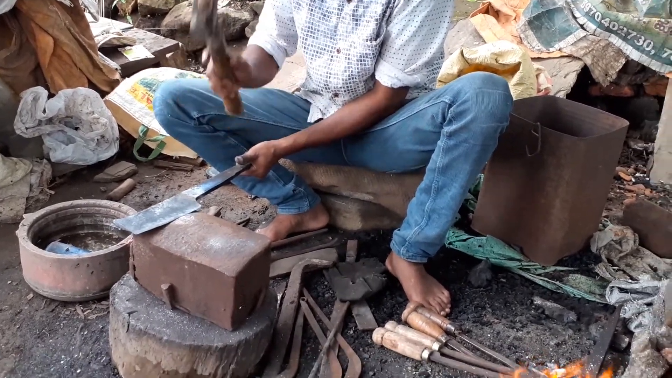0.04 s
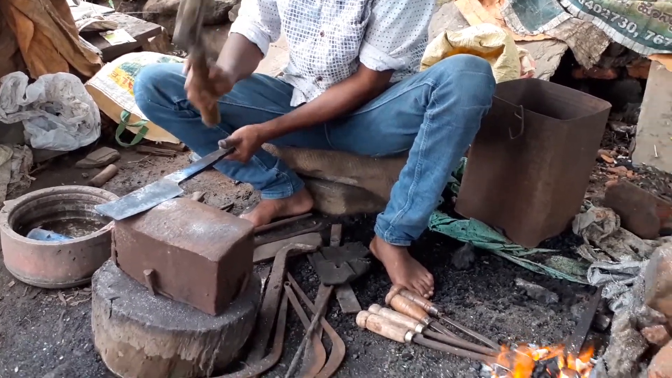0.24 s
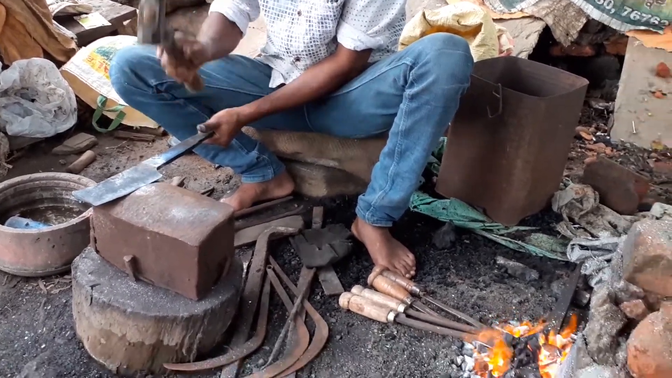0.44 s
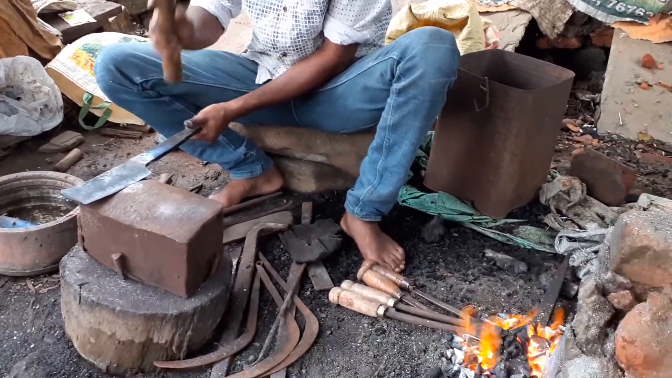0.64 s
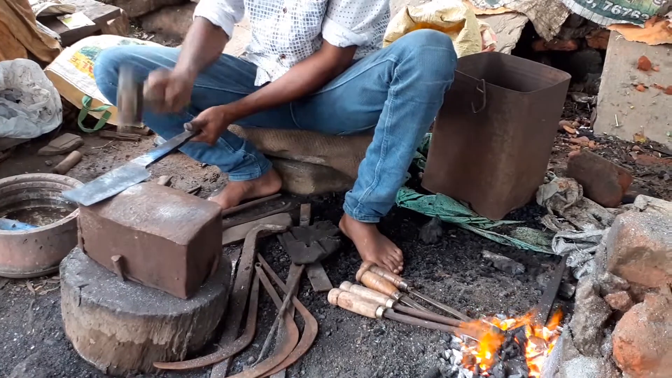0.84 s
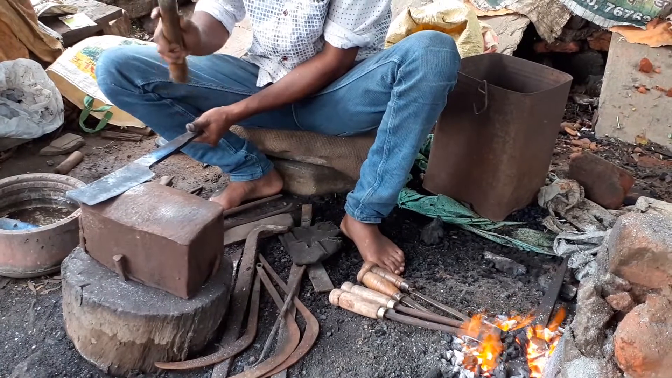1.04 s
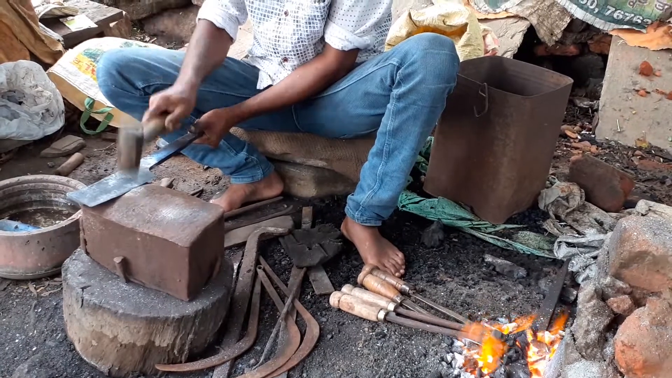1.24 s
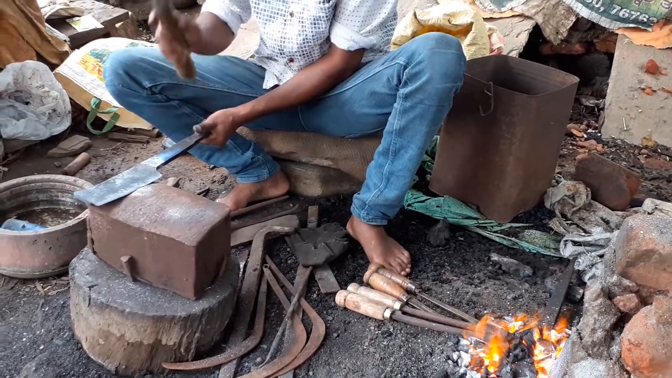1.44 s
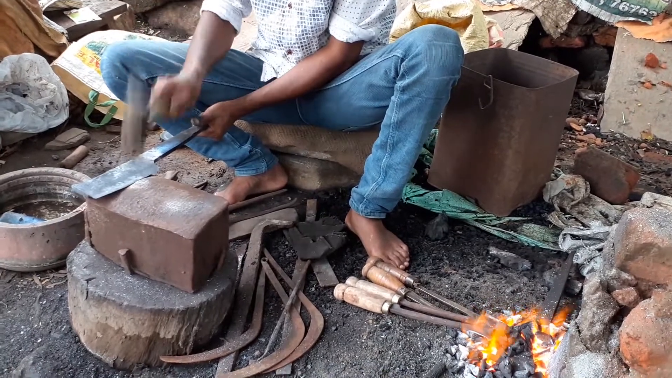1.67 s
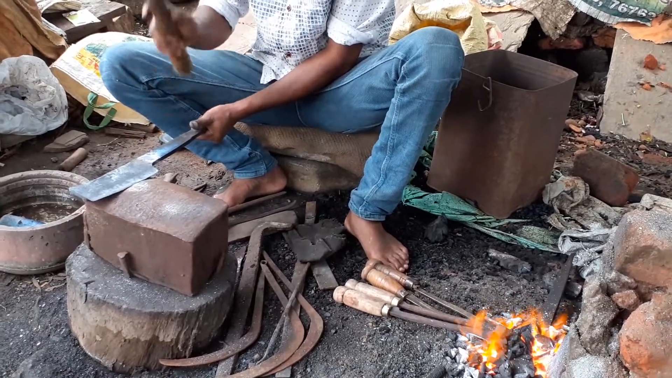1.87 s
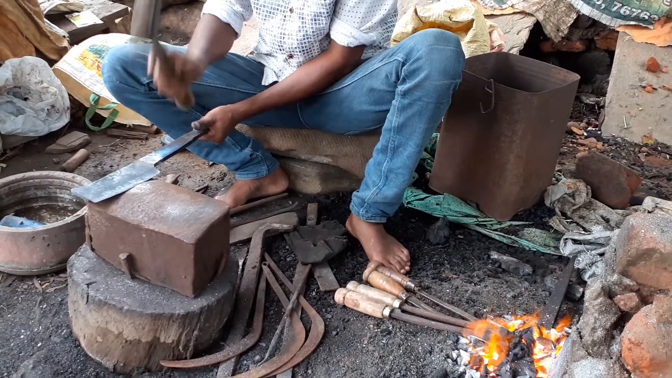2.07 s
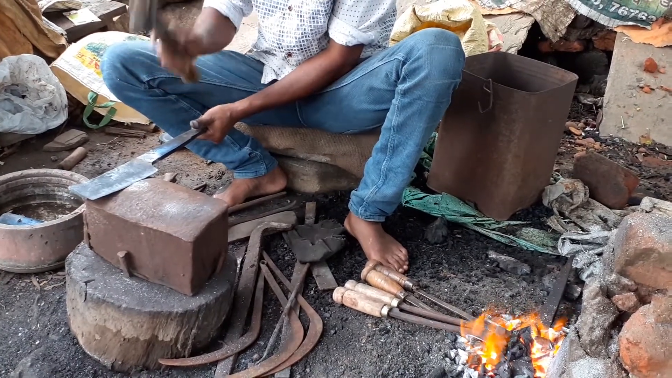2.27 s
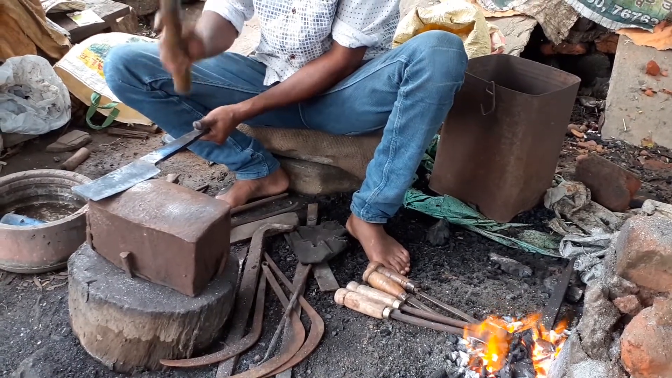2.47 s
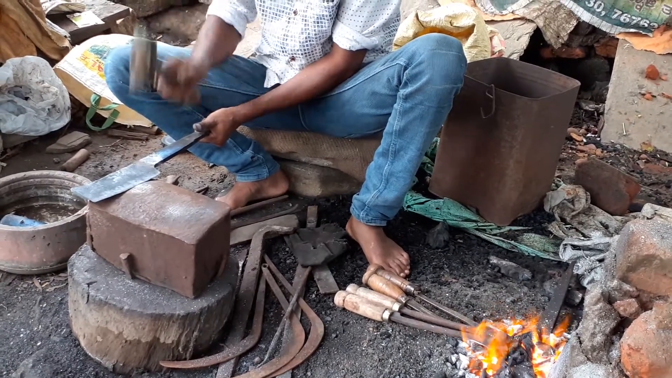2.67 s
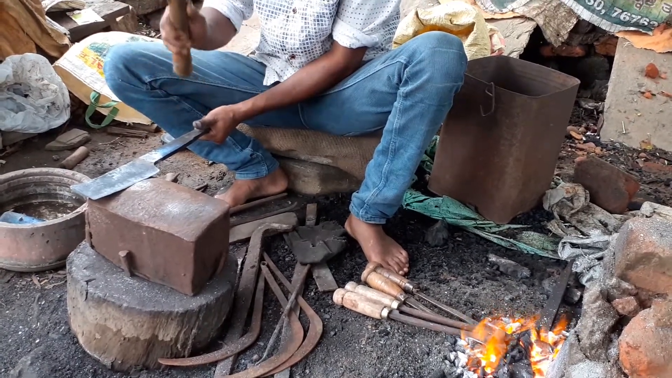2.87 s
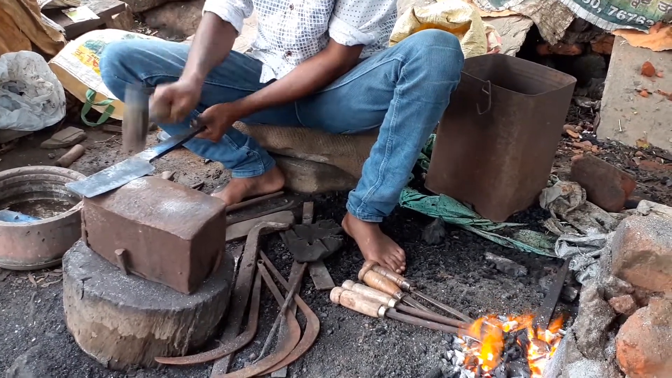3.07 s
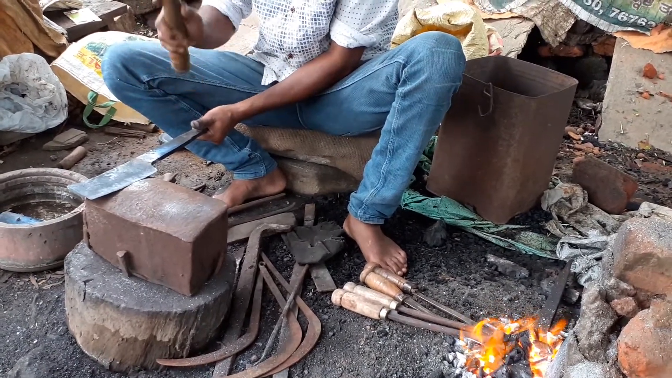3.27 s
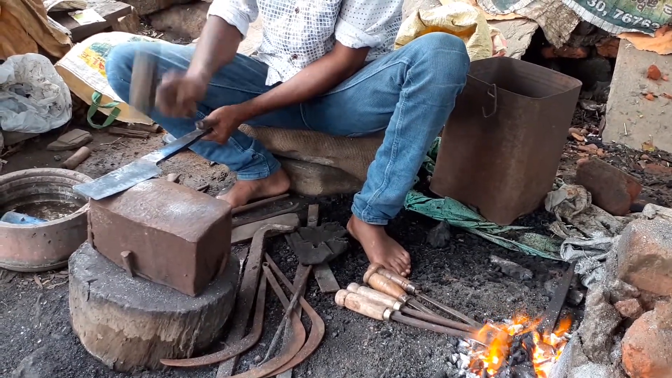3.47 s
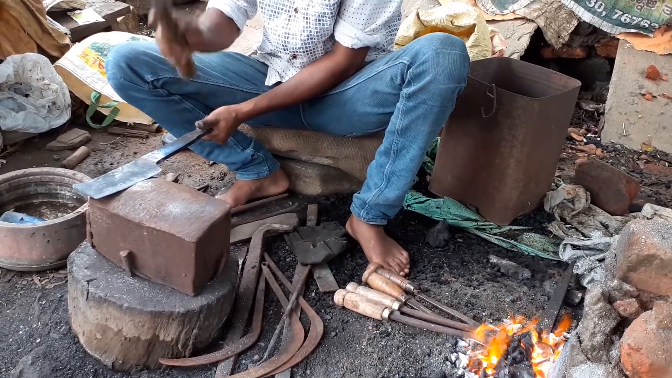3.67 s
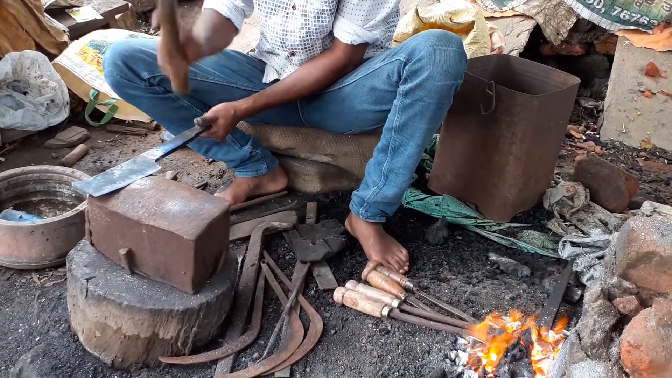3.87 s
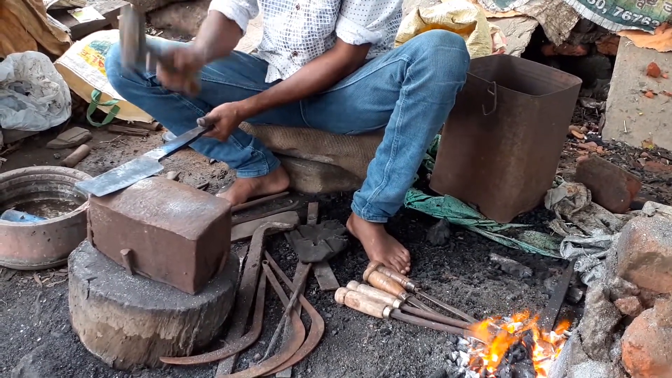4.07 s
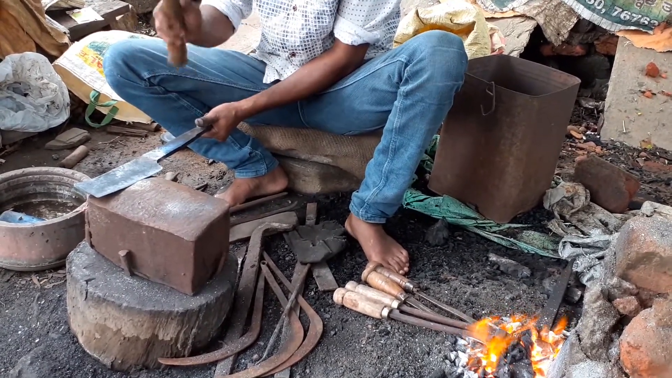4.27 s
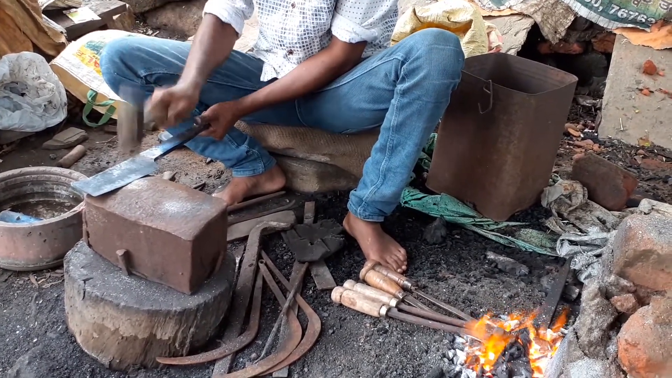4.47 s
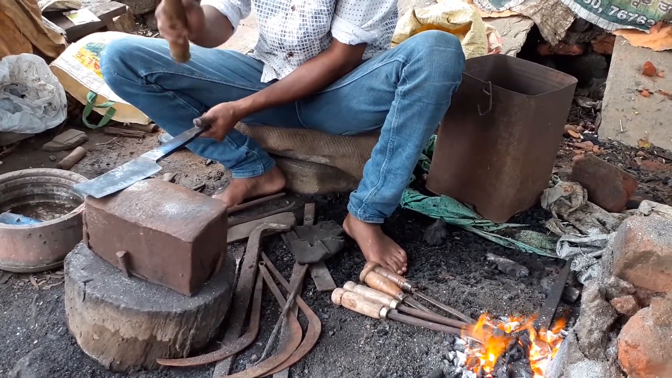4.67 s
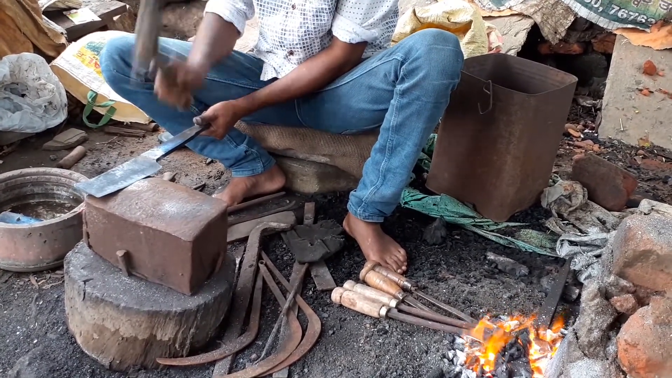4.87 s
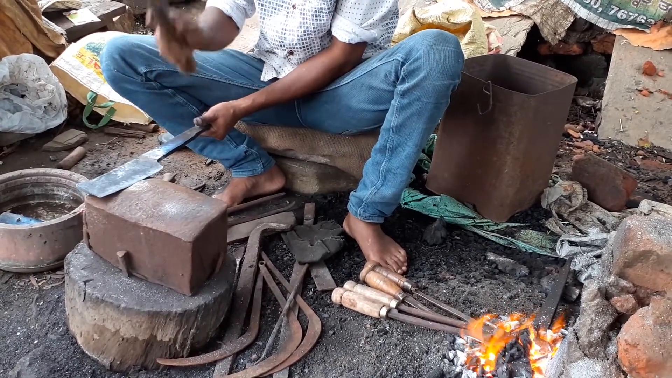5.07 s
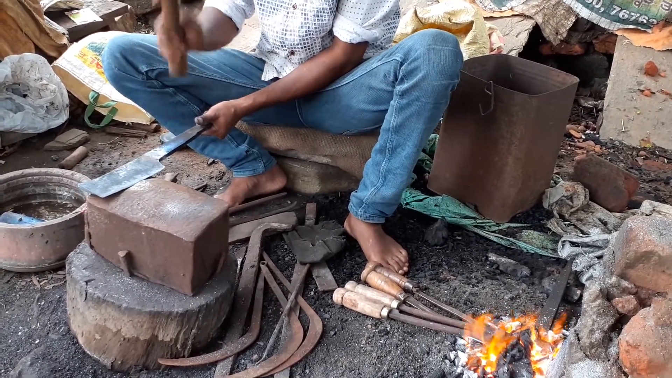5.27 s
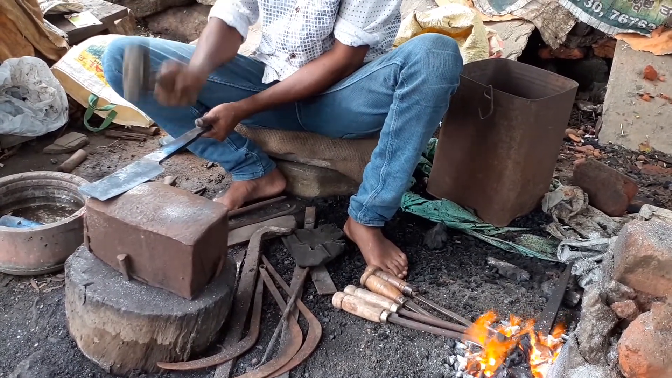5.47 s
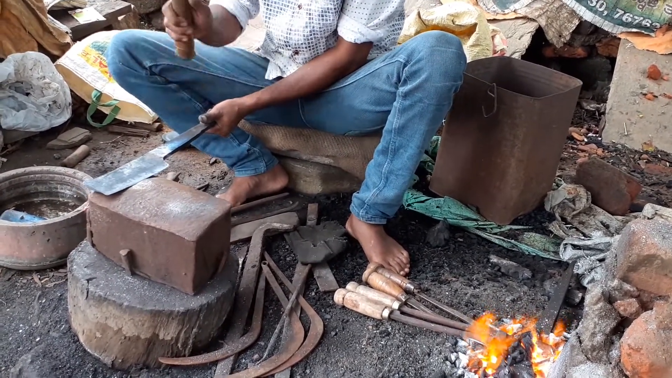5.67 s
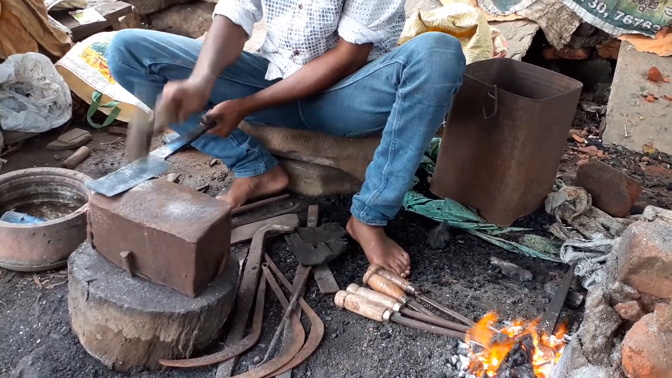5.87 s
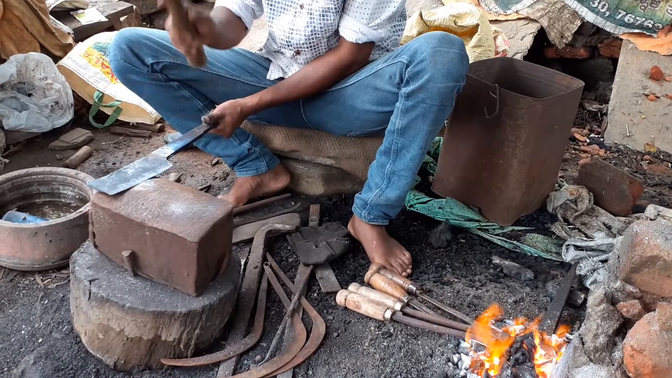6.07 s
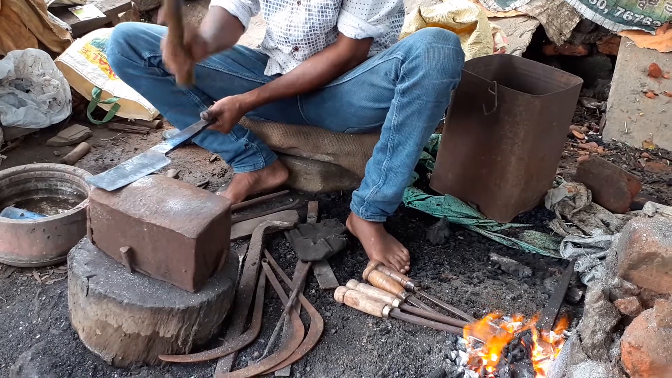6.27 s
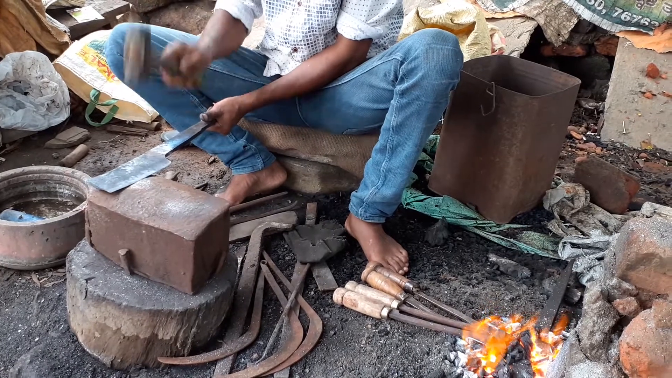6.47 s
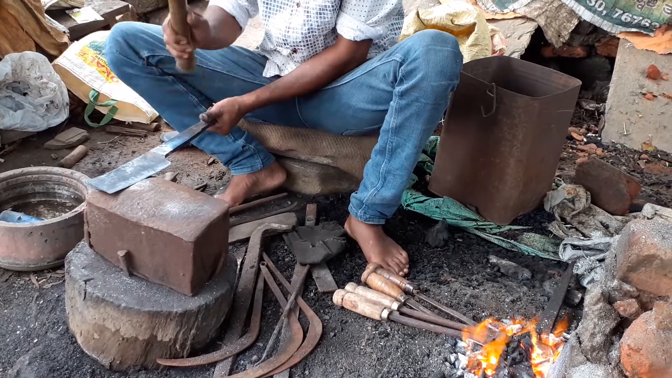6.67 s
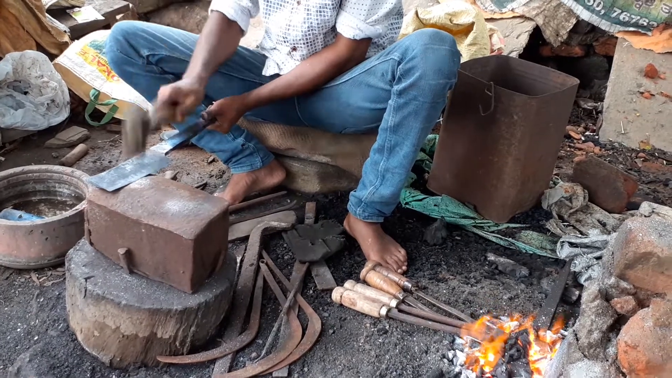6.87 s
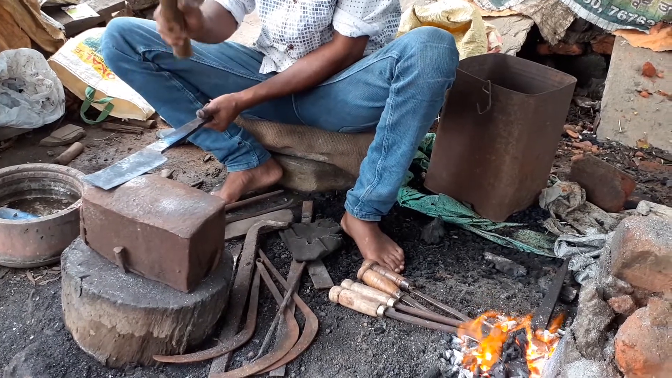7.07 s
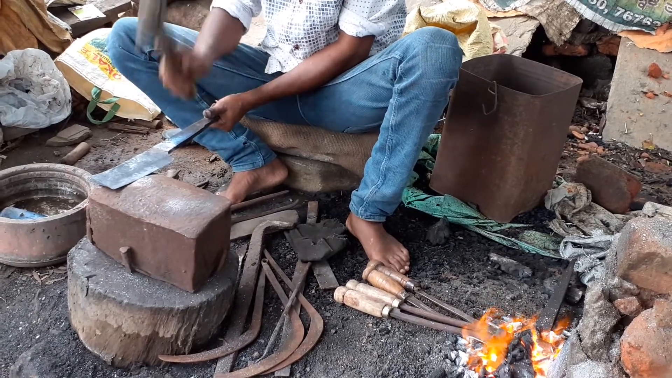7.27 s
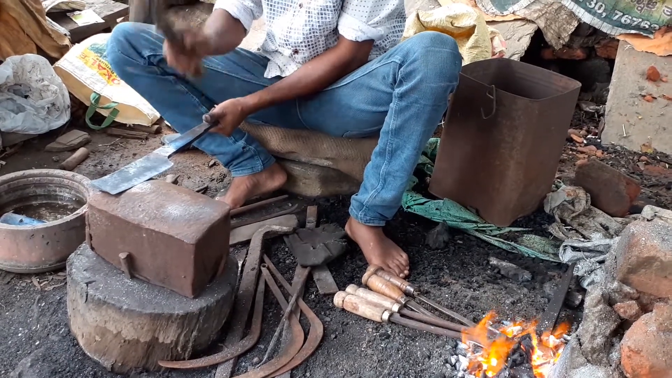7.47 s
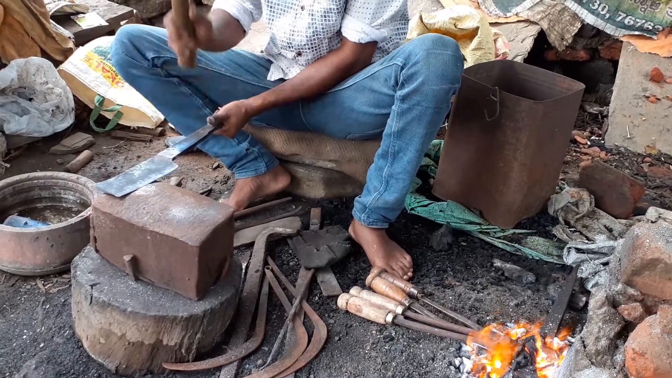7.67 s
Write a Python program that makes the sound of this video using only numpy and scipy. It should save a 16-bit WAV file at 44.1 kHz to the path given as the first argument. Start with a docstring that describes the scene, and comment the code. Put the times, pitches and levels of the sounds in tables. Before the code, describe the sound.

Close stereo sound of an outdoor forge. A faint high metal ring from an earlier blow hangs over restless hiss until the first strike at 0.35 s. Then hard hammer blows fall evenly, roughly every 0.45 to 0.5 s, sixteen in all, the last near 7.35 s. Each is a sharp crack with near-instant echoes, a dense short steel clank, a brief blade ring and a thin, wavering, very high anvil tone sustaining to the next hit. The blows at 0.35 and 0.8 s are brightest and loosest, with a thudding slap-back; from about 1.7 s they are duller, with another bright one at 6.4 s. Fire ticks softly throughout, with clearer snaps near 0.1, 1.7, 2.7 and 7.7 s. A low uneven engine throb swells around 5 s, slows and fades. Blows sit slightly right, with a soft yard reverberation.

```python
"""Hard clanks with quick echoes, about two a second: a smith hammers a steel blade at an outdoor forge.
Noise bursts make crack and clank; decaying sines ring the blade briefly and let the block anvil sing high up.
A loose blade slaps back with a thud. Behind, filtered noise makes the hiss of forge and street,
random kicks of noise make the fire crackle, and uneven firings through a pipe throb as an engine passes."""
import sys
import numpy as np
from scipy import signal
from scipy.io import wavfile
from scipy.ndimage import uniform_filter1d

SR = 44100
rng = np.random.default_rng(int(sys.argv[2]) if len(sys.argv) > 2 else 0)


def inscribe(sig):
    """Save sig as 16-bit PCM at rate SR to the path in sys.argv[1].

    A 1-D sig is mono; a 2-D sig holds one channel per row.
    Samples are clipped to [-1, 1] before scaling.
    """
    pcm = np.round(np.clip(np.atleast_2d(sig).T, -1, 1) * 32767)
    wavfile.write(sys.argv[1], SR, pcm.astype(np.int16))


N = 340443
TIME = np.arange(N) / SR


def from_db(db):
    """Decibels to gain."""
    return 10 ** (np.asarray(db) / 20)


def rms_one(x):
    """Scale to unit rms."""
    return x / np.sqrt(np.mean(x ** 2) + 1e-20)


def at_hz(points, hz):
    """Read a table on a log-frequency axis."""
    points = np.array(points)
    return np.interp(np.log(hz), np.log(points[:, 0]), points[:, 1])


def at_time(points, s):
    """Read a curve at time s."""
    return np.interp(s, *np.transpose(points))


def fade(t, t60):
    """Exponential decay, 60 dB in t60 seconds."""
    return np.exp(-np.log(1000) * t / t60)


def pan_gains(left_right_db):
    """Left and right gains for a level difference between the ears."""
    return from_db([[left_right_db / 2], [-left_right_db / 2]])


def add(out, s, sound):
    """Mix a sound in at time s, trimmed to the length of the scene."""
    start = int(round(s * SR))
    first, last = max(start, 0), min(start + sound.shape[-1], out.shape[-1])
    out[..., first:last] += sound[..., first - start:last - start]


def resonate(x, hz, width_hz):
    """Two-pole resonance with gain 1 on top."""
    r = np.exp(-np.pi * width_hz / SR)
    zeros = np.array([1, 0, -1]) * (1 - r * r) / 2
    poles = [1, -2 * r * np.cos(2 * np.pi * hz / SR), r * r]
    return signal.lfilter(zeros, poles, x + 1e-18)


def resonate_twice(x, hz, width_hz):
    """Two equal resonances in a row, for steeper skirts."""
    return resonate(resonate(x, hz, width_hz), hz, width_hz)


def drift(rate):
    """Slow random curve: normal knots of spread 1, rate of them per second, joined by lines."""
    knots = rng.standard_normal(4096)
    return np.interp(TIME * rate, np.arange(len(knots)), knots)


def bands(white, spectrum, likeness):
    """Yield (Hz, stereo band) from white noise of shape (2 draws, mid and side, .., time); together rms 1."""
    edges = np.geomspace(30, 17000, 25)
    centres = np.sqrt(edges[1:] * edges[:-1])
    gains = from_db(at_hz(spectrum, centres))
    gains = gains / np.sqrt(np.sum(gains ** 2 * np.diff(edges)) * 4 / SR)
    for k, hz in enumerate(centres):
        band_pass = signal.butter(2, edges[k:k + 2], "band", fs=SR, output="sos")
        mid, side = signal.sosfilt(band_pass, white[k % 2])  # neighbouring bands use different draws
        alike = np.clip(at_hz(likeness, hz), -1, 1)
        mid, side = np.sqrt(1 + alike) * mid, np.sqrt(1 - alike) * side
        yield hz, gains[k] * np.stack([mid + side, mid - side], axis=-2)


def struck(t, hz, t60, rise_s, pan_db, gap):
    """One decaying mode; it reaches the two microphones a phase gap apart (radians)."""
    phase = rng.uniform(0, 2 * np.pi) + gap * np.array([[0], [1]])
    envelope = fade(t, t60) * (1 - np.exp(-t / rise_s))
    return pan_gains(pan_db) * np.sin(2 * np.pi * hz * t + phase) * envelope


# nearest moment of the passing engine, its level there, and the time it takes to cover that distance
PASS_S, PASS_DB, PASS_WIDTH_S = 5.1, -36, 0.51
# it eases off while passing: mean firings per second before and after, and the time this takes
FIRINGS_BEFORE, FIRINGS_AFTER, EASE_S = 25.5, 18, 1.2
# resonances of the exhaust pipe: pitch_hz [Hz], width_hz [Hz], level_db [dB, relative]
EXHAUST = [(94.4, 48, -3), (138, 38, -0.5), (184.6, 25, 2)]


def engine(uneven_db=1.0, puff_t60=0.11, scatter=0.28):
    """Uneven firings puff through the exhaust; only their low throb carries this far, swelling as it passes."""
    slowing = (1 - np.tanh((TIME - PASS_S) / EASE_S)) / 2
    rate = FIRINGS_AFTER + (FIRINGS_BEFORE - FIRINGS_AFTER) * slowing
    distance = np.hypot(1, (TIME - PASS_S) / PASS_WIDTH_S)  # 1 at the nearest point
    firing_count = np.cumsum(rate * (1 + .2 * drift(20))) / SR
    firings = np.diff(np.floor(firing_count), prepend=0) * from_db(uneven_db * drift(25))
    gas = signal.lfilter([1], [1, -fade(1 / SR, puff_t60)], firings) * rng.standard_normal(N)
    puffs = rms_one(firings) + rms_one(gas) + scatter * rng.standard_normal((2, N))
    pipe = 0
    for k, (hz, width_hz, db) in enumerate(EXHAUST):
        pipe = pipe + (-1) ** k * from_db(db) * resonate(puffs, hz, width_hz)  # alternating sign
    far = signal.sosfilt(signal.butter(4, 240, fs=SR, output="sos"), pipe)
    return rms_one(far) * from_db(PASS_DB) / distance


# stereo spread of hiss and yard: pitch_hz [Hz], left_right_likeness [1 = same in both ears, 0 = unrelated]
AIR_LIKENESS = [(40, 1), (150, 0.96), (500, 0.86), (1200, 0), (3000, 0.3), (14000, 0)]
# steady hiss of the forge and the street: pitch_hz [Hz], level_db [dB per Hz, relative]
HISS = [(18, -46), (30, -14.5), (189, -0.5), (437, -10), (486, -7.5), (554, -9.5), (1250, -6.5),
        (1460, -11), (3220, -5.5), (3670, -4.5), (6050, -14), (7470, -5), (8740, -108), (12000, -26),
        (16000, -19.5)]
HISS_DB = -38.5  # rms before flicker and surge
# resonances in the hiss: pitch_hz [Hz], width_hz [Hz], level_db [dB rms, before waver and surge]
HISS_PEAKS = [(493, 26, -52.5), (2290, 280, -49.5), (3573, 74, -44), (3698, 100, -46), (7520, 280, -44),
              (11900, 1140, -51.5)]


def forge(flicker_db=1.5, surge_db=0.5, waver_db=1.5):
    """Restless broadband hiss, each band flickering by itself, with a few wavering resonances."""
    hiss = 0
    for hz, band in bands(rng.standard_normal((2, 2, N)), HISS, AIR_LIKENESS):
        hiss = hiss + band * from_db(flicker_db * drift(25))
    out = from_db(HISS_DB) * hiss
    for hz, width_hz, db in HISS_PEAKS:
        alike = np.clip(at_hz(AIR_LIKENESS, hz), 0, 1)
        shared = np.sqrt(alike) * rng.standard_normal(N)
        white = shared + np.sqrt(1 - alike) * rng.standard_normal((2, N))
        out += from_db(db + waver_db * drift(12)) * rms_one(resonate_twice(white, hz, width_hz))
    return out * from_db(surge_db * drift(18))


# loudest snaps of the fire: start_s [s], level_db [dB, relative]
SNAPS = [(0.0854, -22.5), (1.661, -23.5), (2.491, -26), (2.726, -20), (5.2041, -26), (6.131, -28),
         (6.2736, -28), (7.6954, -25.5)]


def crackle(per_s=14, small_db=-42, snap_db=-6.5, snap_t60=0.092,
            centre_hz=3400, width_hz=3500, fizz_db=-7, fizz_hz=12500):
    """Coals snap now and then, over many smaller ticks; each is a decaying noise burst with a bright fizz."""
    tick_db = small_db + 2 * np.minimum(rng.exponential(1, N), 2)
    kicks = (rng.random(N) < per_s / SR) * from_db(tick_db)
    for s, db in SNAPS:
        add(kicks, s, from_db([db + snap_db]))
    envelope = signal.lfilter([1], [1, -fade(1 / SR, snap_t60)], kicks + 1e-18)
    body = resonate_twice(rng.standard_normal((2, N)), centre_hz, width_hz)
    fizz = resonate(rng.standard_normal((2, N)), fizz_hz, width_hz)
    return envelope * (rms_one(body) + from_db(fizz_db) * rms_one(fizz))


# hammer blows, where the spot struck sets the last three columns: start_s [s], brightness_db [dB],
# blade_free_ring_db [dB], anvil_main_tone_db [dB], all levels relative
BLOWS = [(0.353, 1, 0, -1), (0.805, 1.5, -0.5, -3), (1.2551, -0.5, -4.5, -6), (1.7113, -5, -6, -1),
         (2.1626, -6.5, -5.5, -9.5), (2.6167, -4.5, -9, -0.5), (3.0723, -4.5, -8.5, 0.5),
         (3.5297, -2.5, -5.5, -10), (4.0004, -1, -11, -2.5), (4.4704, -2.5, -12, -7),
         (4.9453, -2.5, -8.5, -8.5), (5.4228, -0.5, -9, -16.5), (5.902, -5, -6.5, -7.5),
         (6.394, 2.5, -3.5, -7), (6.8736, -5.5, -7, -3), (7.358, -4, -6, -4)]
# the swings are even, but a loose blade cushions the blow: dB lost per dB of free ring above the mean
CUSHION = 0.18


def strength(free_db):
    """The looser the blade lies, the weaker the clank's body, its echoes and the damped blade modes (dB)."""
    return -CUSHION * (free_db - np.mean([row[2] for row in BLOWS]))


def blow_noise(size, alike):
    """Noise for every blow; the same spot is struck each time, so the blows share some of it."""
    alike = np.clip(alike, 0, 1)
    shared = np.sqrt(alike) * rng.standard_normal((2, 2, 1, size))
    return shared + np.sqrt(1 - alike) * rng.standard_normal((2, 2, len(BLOWS), size))


# the anvil's two clear tones, main then second: pitch_hz [Hz], level_db [dB, relative], t60_s [s]
ANVIL_TONES = [(7236, -12.5, 1.2), (8860, -20.5, .32)]
# its overtones: pitch_hz [Hz], level_db [dB, relative], t60_s [s]
ANVIL_OVERTONES = [(11875, -38, 1.2), (12078, -33.5, 1.1), (12394, -32, 1.05), (12555, -31, 1.0),
                   (14478, -42, .65), (15125, -40, .6), (15416, -37, .55), (15725, -38, .5)]
# overtone level, standing out for a run of blows in the middle: time_s [s], level_db [dB, relative]
OVERTONE_LEVEL = [(0.8, -4.5), (2.17, -13), (2.6, -1), (4.95, 2), (5.42, -7), (7.36, -10)]
# the main tone wanders between the ears: time_s [s], left_right_db [dB]
TONE_PAN = [(0.35, 0.5), (1.7, -7), (3.1, -3.5), (4, -0.5), (7.36, 3.5)]
# the second tone follows the brightness of the blow: dB per dB
SECOND_TONE_FOLLOWS = 0.73


def anvil(rise_s=0.011, waver_db=2.5, earlier_db=-7, second_db=1, top_share=0.088, main_gap=1.0):
    """The block's high modes sing on until the next blow lands and sets them going anew."""
    out = np.zeros((2, N))
    earlier = (-.1, -6, 0, earlier_db)  # still ringing from the blow before
    ends = [row[0] for row in BLOWS] + [N / SR]
    (main_hz, main_level, main_t60), (second_hz, second_level, second_t60) = ANVIL_TONES
    for (s, bright_db, _, main_db), end in zip([earlier] + list(BLOWS), ends):
        t = TIME[:int((end - s + .03) * SR)]
        main = struck(t, main_hz, main_t60, rise_s, at_time(TONE_PAN, s), rng.normal(main_gap, 0.12))
        tone = from_db(main_level + main_db) * main
        second = struck(t, second_hz, second_t60, rise_s, 2.4, rng.normal(1.0, 0.42))
        tone += from_db(second_level + second_db + SECOND_TONE_FOLLOWS * bright_db) * second
        for k, (hz, db, t60) in enumerate(ANVIL_OVERTONES):
            # the highest overtones follow the level curve over time less
            share = 1 if k < len(ANVIL_OVERTONES) // 2 else top_share
            level = from_db(db + share * at_time(OVERTONE_LEVEL, s))
            tone += level * struck(t, hz, t60, rise_s, rng.normal(-5, 5.8), rng.normal(2.15, 0.58))
        add(out, s, tone * fade(np.maximum(t - (end - s), 0), .03))
    # the moving arm shifts the reflections, so the tone wavers
    return out * from_db(waver_db * np.array([drift(35), drift(32)]))


# blade, hammer and stump: pitch_hz [Hz], level_db [dB, relative], t60_s [s],
# free_share [dB per dB of the blade's free ring]
BLADE_MODES = [(172, -22, .17, 0), (807, -26, .22, 0), (945, -17, .1, 0), (1020, -17, .1, 0),
               (1238, -27, .14, .8), (1726, -19, .1, 0), (1835, -18, .11, 0), (2191, -21, .12, 0),
               (2280, -20, .11, 0), (2420, -21, .11, 0), (3270, -11, .17, 1.2), (3590, -22, .16, 0),
               (3655, -16, .13, 0), (3740, -21, .14, 0), (4570, -16, .19, 1.5), (5050, -14, .18, 2.0),
               (5230, -22, .11, 0), (6070, -25, .17, .6), (6270, -20, .19, 1.5), (6870, -20, .16, 1),
               (7496, -13.5, .18, 1.7)]


def blade(blade_db=-0.83, scatter_db=2.0, free_gain_db=3, chatter_s=0.026):
    """Pressed flat it is damped; lying loose it chatters on the face, so its free modes build up and ring."""
    t, out = TIME[:SR // 3], np.zeros((2, N))
    for s, _, free_db, _ in BLOWS:
        for hz, db, t60, share in BLADE_MODES:
            size, tune, pan_db, gap = rng.standard_normal(4)
            loose_db = share * (free_db + free_gain_db * from_db(2 * free_db))
            blow_db = max(1 - share, 0) * strength(free_db)
            level = from_db(blade_db + db + loose_db + blow_db + scatter_db * size)
            rise_s = 0.0012 + share * chatter_s
            add(out, s, level * struck(t, hz * (1 + 0.0021 * tune), t60, rise_s, pan_db, gap * hz / 4000))
    return out


# stereo spread of the blows: pitch_hz [Hz], left_right_likeness [1 = same in both ears, 0 = unrelated]
CLANK_LIKENESS = [(100, 0.98), (900, 0.6), (1600, 0), (4000, 0), (14000, 0.34)]
# a loose blade slapping back on the face: pitch_hz [Hz], level_db [dB per Hz, relative]
SLAP = [(45, 18), (100, 1), (280, 8), (500, -6.5), (2000, -8), (3300, -1), (5000, -14), (7500, -6),
        (9000, -25), (15000, -14)]


def slaps(slap_db=-14, delay_s=0.023, slap_t60=0.069, follows_free=0.89, follows_bright=1.2):
    """The blade springs up and slaps back with a thud, louder the looser it lies and the brighter the blow."""
    t, out = TIME[:SR // 4], np.zeros((2, N))
    noise = blow_noise(size=len(t), alike=0.094)
    slap = sum(band for hz, band in bands(noise, SLAP, CLANK_LIKENESS))
    for k, (s, bright_db, free_db, _) in enumerate(BLOWS):
        level = from_db(slap_db + follows_free * free_db + follows_bright * bright_db)
        add(out, s + delay_s, level * slap[k] * fade(t, slap_t60))
    return out


# dense clank of hammer, blade and anvil face: pitch_hz [Hz], level_db [dB per Hz, relative]
CLANK = [(60, 3), (170, 1.5), (330, -4.5), (600, -8), (950, 4), (1250, -2), (1800, 1.5), (2800, -2),
         (3700, 3), (4400, -11.5), (5300, -2.5), (5900, -5), (7000, -3), (8500, -21), (15500, -12)]
# its decay: pitch_hz [Hz], t60_s [s]
CLANK_T60 = [(100, 0.11), (900, 0.081), (2500, 0.14), (6000, 0.14), (14000, .14)]
SAME_SPOT = .72  # share of the clank noise common to all blows
# first crack of the contact: pitch_hz [Hz], level_db [dB per Hz, relative]
CRACK = [(100, 26), (600, -34), (1500, -6.5), (3500, 12), (5500, 10), (7500, -0.5), (9000, -9),
         (15000, -12)]
# near echoes of the crack: delay_s [s], level_db [dB, relative], centre_hz [Hz], width_hz [Hz]
ECHOES = [(.0064, 8, 2190, 2040), (.0078, 21, 1230, 890), (.012, -25, 1100, 880), (0.019, -5, 1000, 900)]
# the yard's reverberation: pitch_hz [Hz], level_db [dB per Hz, relative]
YARD = [(100, -10), (600, -4), (1400, -1), (2300, 10.5), (3700, 3), (5000, 10.5), (7500, -26.5),
        (9000, -57), (12300, -13), (15000, -25)]


def clanks(clank_db=-5, crack_db=-1.5, crack_t60=0.011, echo_gain_db=-.5, yard_db=-31, yard_t60=0.95):
    """The contact cracks and echoes, crowded steel modes clank as noise, and the yard answers softly."""
    t, out = TIME[:SR // 2], np.zeros((2, N))
    short = t[:SR // 4]
    times, bright_db, free_db, _ = np.transpose(BLOWS)
    strength_db = strength(free_db)
    clank = 0
    for hz, band in bands(blow_noise(size=len(short), alike=SAME_SPOT), CLANK, CLANK_LIKENESS):
        # a loose blade takes body from the clank; a brighter blow has more treble
        treble = np.clip(np.log2(hz / 1800), 0, 1)
        level_db = (1 - treble) * strength_db + treble * (bright_db - bright_db.mean())
        clank = clank + band * fade(short, at_hz(CLANK_T60, hz)) * from_db(level_db)[:, None, None]
    crack_noise = blow_noise(size=len(short), alike=0.61)
    crack = sum(band for hz, band in bands(crack_noise, CRACK, CLANK_LIKENESS))
    crack = crack * fade(short, crack_t60) * from_db(crack_db)
    yard_noise = blow_noise(size=len(t), alike=0.37)
    yard = sum(band for hz, band in bands(yard_noise, YARD, AIR_LIKENESS))
    for k, s in enumerate(times):
        add(out, s, from_db(clank_db) * clank[k] + crack[k])
        add(out, s, from_db(yard_db) * yard[k] * fade(t, yard_t60))
        for delay_s, echo_db, hz, width_hz in ECHOES:
            echo = resonate_twice(crack[k], hz, width_hz)
            add(out, s + delay_s, from_db(echo_gain_db + echo_db + strength_db[k]) * echo)
    return out


def scene(pan_db=-2.5):
    """The smith's work close by and a little to the right, fire and street behind."""
    background = engine() + forge() + crackle()
    work = (clanks() + blade() + slaps()) * pan_gains(pan_db)
    return background + anvil() + work


# limiter threshold and recovery speed, and the upper edge of the sound
LIMIT_DB, RELEASE_DB_PER_S, CUTOFF_HZ = -10.5, 420, 15800


def record(dry, low_cut_hz=42):
    """The deepest bass is cut, a limiter holds down the loudest moments, peaks are rounded, the top is cut."""
    dry = signal.sosfilt(signal.butter(3, low_cut_hz, "high", fs=SR, output="sos"), dry)
    power = uniform_filter1d(np.mean(dry ** 2, axis=0), size=100)
    level_db = 10 * np.log10(np.maximum(power, 1e-12))
    # the gain cut follows rises at once and lets go at a steady rate
    release = RELEASE_DB_PER_S * TIME
    held_db = np.maximum.accumulate(np.maximum(level_db - LIMIT_DB, 0) + release) - release
    limited = dry * from_db(-uniform_filter1d(held_db, size=40))
    rounded = limited / (1 + limited ** 4) ** .25
    return signal.sosfilt(signal.ellip(10, .1, 80, CUTOFF_HZ, fs=SR, output="sos"), rounded)


dry = scene()
out = record(dry)
inscribe(out)
```